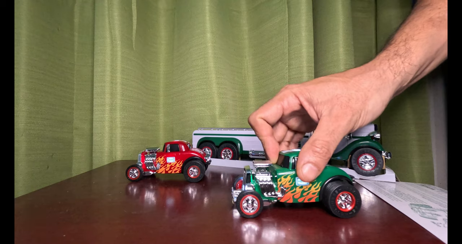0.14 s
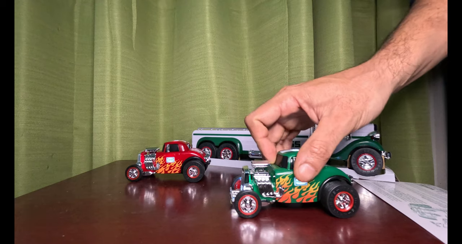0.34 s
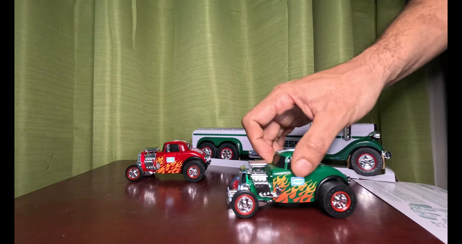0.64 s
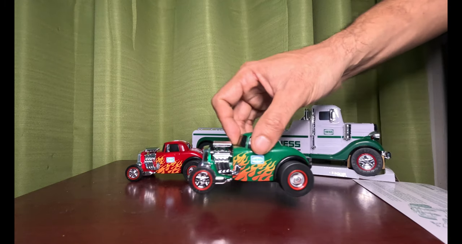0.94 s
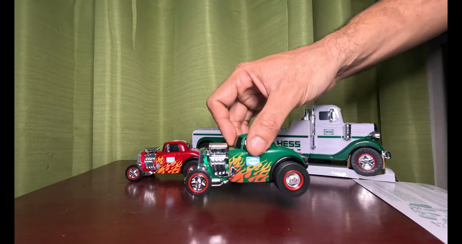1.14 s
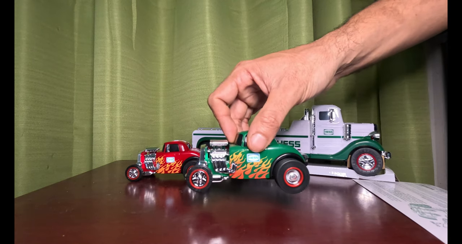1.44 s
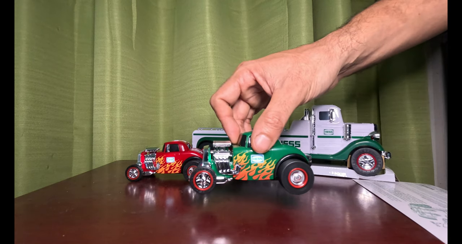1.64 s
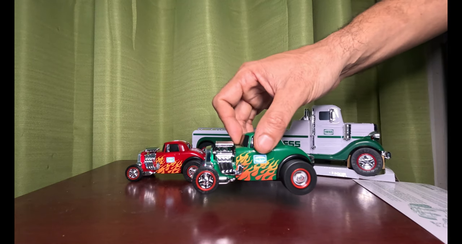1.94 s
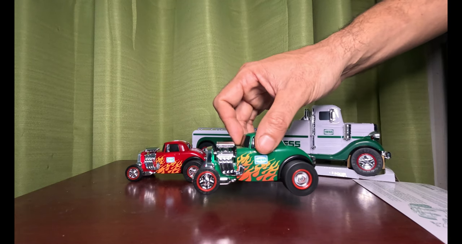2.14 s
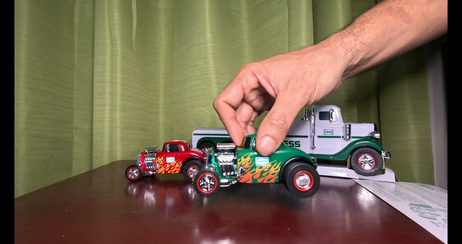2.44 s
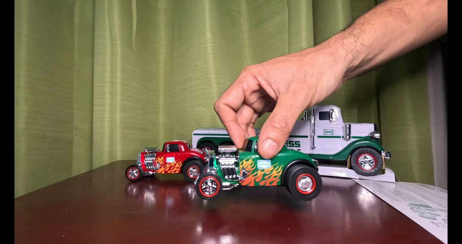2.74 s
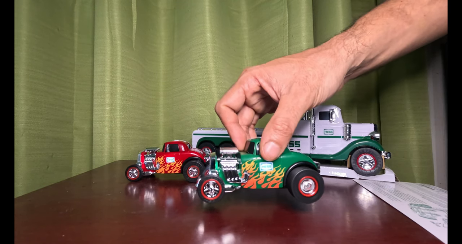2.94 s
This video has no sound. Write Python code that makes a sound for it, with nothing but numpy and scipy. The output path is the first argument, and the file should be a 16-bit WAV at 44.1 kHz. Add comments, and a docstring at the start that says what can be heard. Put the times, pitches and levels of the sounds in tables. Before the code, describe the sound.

After a few plastic clicks, a wound-up toy car's gears whir and rattle on.

```python
"""The spring motor of a wound-up pull-back toy car runs while a hand holds it over a table.
Tooth impacts excite the resonances of gearbox and shell: the meshing gears spin up to a whir,
then loose gears chatter in uneven bursts. Before this, a faint whirr fades and the plastic body
clicks as the car is lifted. Low handling thumps and a quiet rumble lie underneath, in a small room."""
import sys
import numpy as np
from scipy import signal
from scipy.fft import rfft, irfft
from scipy.io import wavfile

SR = 44100
rng = np.random.default_rng(int(sys.argv[2]) if len(sys.argv) > 2 else 0)


def store_pcm(level_fs):
    """Save levels as 16-bit WAV."""
    pcm = np.round(np.clip(level_fs, -1, 1) * 32767).astype(np.int16)
    wavfile.write(sys.argv[1], SR, np.atleast_2d(pcm).T)


N = 136710

# Background spectrum, low and high parts: frequency_hz, gain_db
RUMBLE_SPECTRUM = [(25, 1), (42, -3), (65, 0.5), (100, -2.5), (140, -12.5), (240, -16), (350, -28)]
HISS_SPECTRUM = [(750, -43), (2500, -51), (6000, -50), (15000, -72)]
# Likeness of the background at the two ears: frequency_hz, correlation
BACKGROUND_CORRELATION = [(90, 0.94), (200, 0.66), (500, 0.36), (8000, 0.43)]
# Level difference of the car between the ears: frequency_hz, left_minus_right_db
EAR_BALANCE = [(1000, -1), (4200, -1), (5200, -4.5), (6700, 1.5), (8600, -8), (11000, 0)]
# Handling thumps: peak_s, level_db, pitch_hz, rise_s, decay_s
THUMP_EVENTS = [(.01, -31.5, 65.1, 0.052, 0.071), (0.281, -33.5, 91.3, 0.025, 0.025),
                (0.365, -27, 78.5, 0.022, 0.038), (0.447, -27, 70.5, 0.025, 0.024),
                (0.508, -30.5, 63.3, 0.014, 0.11), (0.704, -28.5, 79.4, 0.0063, 0.054),
                (1.223, -26.5, 67.5, 0.071, 0.058), (1.312, -30, 67.2, 0.029, 0.092),
                (1.539, -39.5, 66.5, 0.025, 0.03), (1.96, -35.5, 70.5, 0.04, 0.084),
                (2.028, -37.5, 60, 0.02, 0.11), (2.275, -33.5, 79, 0.0097, 0.034),
                (2.75, -33, 66.4, 0.06, 0.11)]
# Envelope of the faint opening whirr: time_s, level_db
FAINT_ENVELOPE = [(0, -62.5), (.32, -69.5), (.52, -82)]
# Spectrum of that whirr: frequency_hz, gain_db
FAINT_SPECTRUM = [(800, -28), (1260, -12), (1650, -6.5), (2300, -37), (4100, -32), (9000, -55)]
# Scuffs as the car shifts: centre_s, width_s, level_db
SCUFF_EVENTS = [(.502, 0.008, -67.5), (.643, 0.019, -64)]
# Spectrum of a scuff: frequency_hz, gain_db
SCUFF_SPECTRUM = [(1000, -7), (1900, 2.5), (2800, -5), (5500, -7), (6500, -2), (8300, -17), (10500, -10),
                  (14000, -31)]
# Clicks of the plastic body: start_s, relative_level_db, tilt_db_per_octave
CLICK_EVENTS = [(0.454, -47, -17), (0.715, -45, -7), (0.725, -35.5, 2), (.755, -45, 6), (0.788, -41, -3.5),
                (0.837, -36, -1)]
# Spectrum of a click: frequency_hz, gain_db
CLICK_SPECTRUM = [(800, -28), (1100, 1), (2200, -5), (3400, 0.5), (5000, -8), (15000, -53)]
# Resonances of the plastic body, and of gearbox and shell: frequency_hz, width_hz, strength_db
BODY_MODES = [(1120, 130, 2), (1780, 80, 4), (2490, 110, 3), (3460, 120, 2)]
GEARBOX_MODES = [(1351, 39, 1.5), (4870, 110, -13.5), (7300, 26, -14)]
# Envelope of the smoothly meshing gears: time_s, level_db
WHIR_ENVELOPE = [(.815, -65), (.845, -53), (.89, -46), (.94, -38.5), (0.981, -29.5), (1.03, -27),
                 (1.12, -25), (1.2, -27.5), (1.25, -40.5), (1.4, -70)]
# Spectra of meshing and of knocking gears: frequency_hz, gain_db
WHIR_SPECTRUM = [(150, -30), (300, -20), (780, -18.5), (1050, -5), (1500, -2.5), (2150, 4), (2600, -6.5),
                 (3900, 1), (5200, 3), (6300, -4), (8200, -14.5), (9300, -13), (10100, -4.5), (11000, -5.5),
                 (11800, -22), (13200, -17), (15000, -41)]
CHATTER_SPECTRUM = [(420, -37), (560, -27), (830, -29), (1050, -13.5), (1330, -6.5), (1480, -21),
                    (1700, -6.5), (2780, -14.5), (3400, -9), (3750, -1), (4200, -5), (4950, -0.5),
                    (5400, -4.5), (6000, -12), (7300, -10), (8200, -21), (9300, -13), (10200, -11.5),
                    (11900, -24.5), (13700, -27.5), (15000, -49)]
# Bursts of gear chatter: start_s, length_s, relative_level_db
CHATTER_BURSTS = [(0.842, 0.0027, -43), (0.916, 0.003, -33.5), (1.128, 0.0058, -21.0),
                  (1.164, 0.026, -20.5), (1.201, 0.02, -21.5), (1.264, 0.0034, -18.5),
                  (1.285, 0.052, -18.5), (1.35, 0.018, -20), (1.373, 0.026, -21), (1.406, 0.043, -20),
                  (1.453, 0.043, -27), (1.528, 0.021, -25), (1.606, 0.022, -24), (1.637, 0.0057, -21),
                  (1.659, 0.01, -20.5), (1.7, 0.014, -18.5), (1.72, 0.035, -21), (1.782, 0.0059, -20.5),
                  (1.8, 0.0027, -17), (1.809, .04, -21.5), (1.869, 0.036, -20), (1.909, 0.013, -19),
                  (1.935, 0.0062, -25.5), (1.944, 0.0091, -19.5), (1.957, 0.048, -20), (2.014, 0.0185, -20),
                  (2.051, 0.019, -21.5), (2.081, 0.013, -23), (2.121, 0.031, -20), (2.165, 0.067, -21.5),
                  (2.239, 0.051, -20.5), (2.303, 0.023, -21), (2.333, 0.014, -22), (2.363, 0.047, -21.5),
                  (2.422, 0.008, -20), (2.443, 0.02, -20.5), (2.478, 0.053, -20.5), (2.543, 0.054, -22.5),
                  (2.608, 0.012, -19.5), (2.631, 0.0051, -23.5), (2.656, 0.011, -23), (2.709, 0.071, -21),
                  (2.794, 0.012, -21.5), (2.825, 0.087, -21), (2.932, 0.047, -22), (2.969, 0.042, -24),
                  (3.02, 0.004, -19.5), (3.033, 0.011, -21.5), (3.061, 0.01, -22), (3.086, 0.013, -22.5)]

MOTOR_START_S, FULL_SPEED_S, FULL_BRIGHTNESS_S = WHIR_ENVELOPE[0][0], 0.92, 1.0
TIME_S, FREQUENCY_HZ = np.arange(N) / SR, np.fft.rfftfreq(N, 1 / SR)


def amp(db):
    """Amplitude ratio of a level in decibels."""
    return 10 ** (np.asarray(db) / 20)


def unit_rms(x):
    """Normalisation to unit mean power."""
    return x / np.sqrt(np.mean(x ** 2) + 1e-20)


def curve_at(points, hz):
    """Interpolation on a logarithmic frequency axis."""
    f, value = np.transpose(points)
    return np.interp(np.log(hz + 1), np.log(f + 1), value)


def envelope(points):
    """Amplitude envelope interpolated in decibels, silent outside its span."""
    return amp(np.interp(TIME_S, *np.transpose(points), left=-np.inf, right=-np.inf))


def add(mix, start_s, sound):
    """Superposition of a sound on the mix from a given time."""
    part = mix[max(0, round(start_s * SR)):][:len(sound)]
    part += sound[:len(part)]


def coloured(x, spectrum, modes=(), tilt_db=0, size=4096):
    """Minimum-phase filter of unit energy: a spectrum, resonances and a tilt per octave above 1 kHz."""
    hz = abs(np.fft.fftfreq(size, 1 / SR))
    gain = amp(curve_at(spectrum, hz) + tilt_db * np.log2(np.maximum(hz, 1000) / 1000))
    gain *= 1 + sum(amp(db) / (1 + (2 * (hz - f) / width) ** 2) for f, width, db in modes)
    log_response = np.conj(signal.hilbert(np.log(gain)))
    impulse_response = np.fft.ifft(np.exp(log_response)).real
    return signal.fftconvolve(x, impulse_response / np.linalg.norm(impulse_response))[:len(x)]


def background(level_db=-48.5):
    """Partially coherent noise: rumble and hiss, nearly alike at both ears in the bass."""
    left, independent = rfft(rng.standard_normal((2, N)))
    correlation = curve_at(BACKGROUND_CORRELATION, FREQUENCY_HZ)
    right = correlation * left + np.sqrt(1 - correlation ** 2) * independent
    gain = amp(curve_at(RUMBLE_SPECTRUM + HISS_SPECTRUM, FREQUENCY_HZ))
    return amp(level_db) * unit_rms(irfft(np.array([left, right]) * gain, N))


def reflections(x, t60_s, level_db, size=16000):
    """Reverberation: sparse reflections, different at each ear, decay exponentially."""
    t = np.arange(size) / SR
    signs = rng.choice([-1, 1], (2, size))
    arrivals = (rng.random((2, size)) < .1) * (t > .001)
    taps = signs * arrivals * np.exp(-np.log(1000) * t / t60_s)
    taps /= np.linalg.norm(taps, axis=1, keepdims=True)
    return amp(level_db) * signal.fftconvolve(x[None], taps, axes=1)[:, :N]


def scattered_treble(x, level_db=-11):
    """Scattering: an incoherent share of the treble reaches the ears in opposite phase."""
    diffuse = coloured(x * rng.standard_normal(N), CHATTER_SPECTRUM, tilt_db=0.5)
    return amp(level_db) * diffuse * np.array([[1], [-1]])


def direct_sound(x, lead_s=.000028, lead_below_hz=5030):
    """Interaural time and level differences: the sound is earlier and mostly louder on the right."""
    delay_s = lead_s / (1 + (FREQUENCY_HZ / lead_below_hz) ** 10)
    left = amp(curve_at(EAR_BALANCE, FREQUENCY_HZ) / 2) * np.exp(-1j * np.pi * FREQUENCY_HZ * delay_s)
    return irfft(rfft(x) * np.array([left, 1 / left]), N)


def handling_thumps():
    """Damped oscillation: each thump is one low tone that swells, then decays exponentially."""
    out = np.zeros(N)
    for peak_s, level_db, pitch_hz, rise_s, decay_s in THUMP_EVENTS:
        t = TIME_S - peak_s
        shape = np.exp(-np.where(t < 0, (t / rise_s) ** 2, t / decay_s))
        out += amp(level_db) * shape * np.sin(2 * np.pi * (pitch_hz * t + rng.random()))
    return out


def faint_whirr():
    """Narrow-band noise: a soft whirr dies away while the car is still held down."""
    return coloured(rng.standard_normal(N) * envelope(FAINT_ENVELOPE), FAINT_SPECTRUM)


def finger_scuffs():
    """Friction noise: the plastic shifts under the fingers in brief, bell-shaped strokes."""
    strokes = sum(amp(level_db) * np.exp(-((TIME_S - centre_s) / width_s) ** 2 / 2)
                  for centre_s, width_s, level_db in SCUFF_EVENTS)
    return coloured(strokes * rng.standard_normal(N), SCUFF_SPECTRUM)


def body_clicks(gain_db=16, crunch_s=0.0017, rattle_s=0.027, rattle_db=-22, size=5000):
    """Impulsive excitation: a brief crunch with a faint rattling tail rings the body's modes."""
    out, t = np.zeros(N), np.arange(size) / SR
    decay = np.exp(-t / crunch_s) + amp(rattle_db) * np.exp(-t / rattle_s)
    for start_s, level_db, tilt_db in CLICK_EVENTS:
        hit = rng.standard_normal(size) * decay
        click = coloured(hit / np.linalg.norm(hit), CLICK_SPECTRUM, BODY_MODES, tilt_db)
        add(out, start_s, amp(level_db + gain_db) * click)
    return out


def tooth_ticks(full_rate_hz=4500, doubling_s=0.079, spread_db=4.5):
    """Shot noise: random tooth impacts, whose rate grows exponentially up to full speed."""
    speed = 2 ** (np.clip(TIME_S - FULL_SPEED_S, -.2, 0) / doubling_s)
    strengths = unit_rms(amp(spread_db * np.clip(rng.standard_normal(N), -2, 2)))
    chance = speed * full_rate_hz / SR
    impacts = (rng.random(N) < chance) * rng.choice([-1, 1], N)
    return impacts * strengths / np.sqrt(chance)  # equal power at every rate


def shell_ring(pitch_hz=1320, width_hz=230, level_db=-44.5):
    """Forced resonance: the hollow shell swells during spin-up and rings on with the running gears."""
    swell = np.clip((TIME_S - MOTOR_START_S) / (FULL_SPEED_S - MOTOR_START_S), 0, 1) ** 2
    b, a = signal.iirpeak(pitch_hz, pitch_hz / width_hz, fs=SR)
    ring = signal.lfilter(b, a, signal.lfilter(b, a, tooth_ticks() * swell))
    return amp(level_db) * unit_rms(ring)


def gear_whir():
    """Source and filter: smoothly meshing teeth drive the gearbox, dull when slow, then brighter."""
    drive = tooth_ticks() * envelope(WHIR_ENVELOPE)
    brightness = np.interp(TIME_S, [MOTOR_START_S, FULL_BRIGHTNESS_S], [0, 1]) ** 2
    fast = coloured(drive * brightness, WHIR_SPECTRUM, GEARBOX_MODES)
    slow = coloured(drive * (1 - brightness), WHIR_SPECTRUM, GEARBOX_MODES, tilt_db=-5)
    return fast + slow


def knock_train(length_s, level_db, count=100, size=350):
    """Backlash: loose gears knock unevenly; each knock skitters over teeth and rings at its own pitch."""
    rate_hz, log_gap_spread, strength_spread_db, skitter_s = 440, .42, 1.74, 0.0011
    ring_hz, log_pitch_spread, ring_share = 4900, 0.12, 0.093
    gap_draws, strength_draws, pitch_draws = np.clip(rng.standard_normal((3, count)), -1.5, 1.5)
    t = np.arange(size) / SR
    pitches_hz = ring_hz * np.exp(log_pitch_spread * pitch_draws)
    rings = np.sqrt(2 * ring_share) * np.sin(2 * np.pi * pitches_hz[:, None] * t)
    skitters = np.sqrt(1 - ring_share) * rng.choice([-1, 1], (count, size))
    knocks = (skitters + rings) * np.sqrt(t / skitter_s) * np.exp(-t / skitter_s)
    gaps_s = np.exp(log_gap_spread * gap_draws) / rate_hz
    out = np.zeros(round(length_s * SR) + size)
    for start_s, strength, knock in zip(np.cumsum(gaps_s) - gaps_s[0], strength_draws, knocks):
        if start_s < length_s - skitter_s:
            add(out, start_s, amp(strength_spread_db * strength) * knock)
    return amp(level_db) * np.sqrt(length_s * SR) * out / (np.linalg.norm(out) + 1e-12)


def gear_chatter(burst_gain_db=-3.5, light_from_s=1.2, light_db=-35.5):
    """Modal response: bursts of knocks, and light knocking between them, ring gearbox and shell."""
    knocks = np.zeros(N)
    add(knocks, light_from_s, knock_train(N / SR - light_from_s, light_db, count=1500))
    for start_s, length_s, level_db in CHATTER_BURSTS:
        add(knocks, start_s, knock_train(length_s, level_db + burst_gain_db))
    return coloured(knocks, CHATTER_SPECTRUM, GEARBOX_MODES)


def scene():
    """Superposition of the car's direct, scattered and reflected sound with thumps and background."""
    motor = gear_whir() + gear_chatter() + shell_ring()
    car = motor + body_clicks() + finger_scuffs() + faint_whirr()
    scattered = scattered_treble(motor)
    table = reflections(car, t60_s=0.016, level_db=-15)
    room = reflections(car, t60_s=0.36, level_db=-15)
    return direct_sound(car) + scattered + table + room + handling_thumps() + background()


def record(dry):
    """Band limiting: a linear-phase low-pass filter removes the treble above 15 kHz."""
    low_pass = signal.firwin(201, 15000, window=("kaiser", 9), fs=SR)
    return signal.oaconvolve(dry, low_pass[None], "same")


dry = scene()
out = record(dry)
store_pcm(out)
```